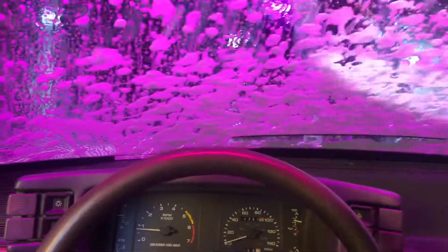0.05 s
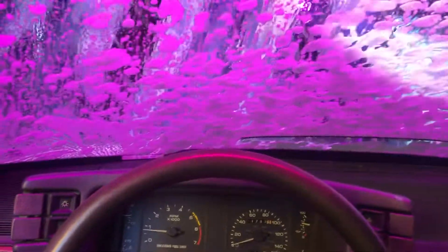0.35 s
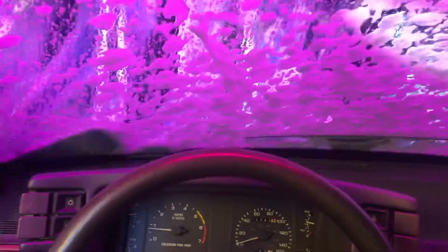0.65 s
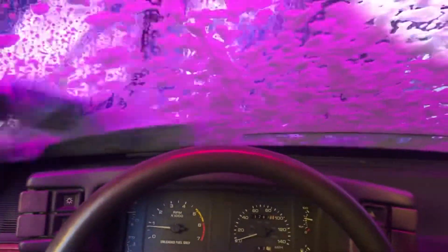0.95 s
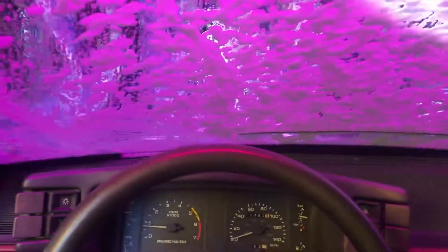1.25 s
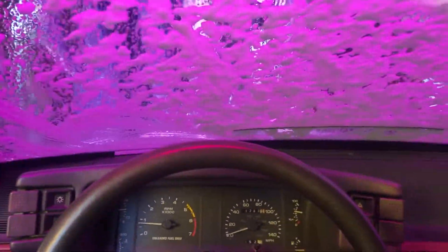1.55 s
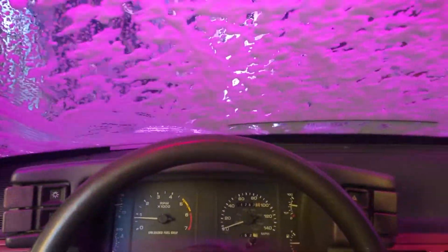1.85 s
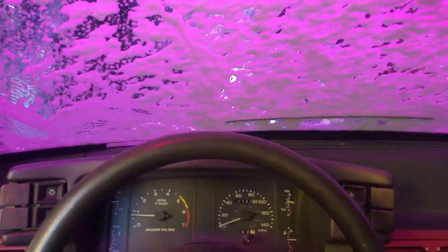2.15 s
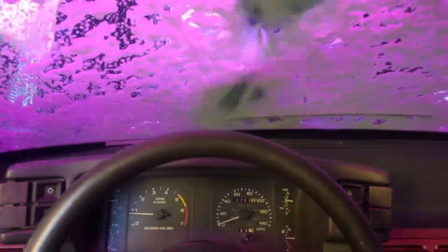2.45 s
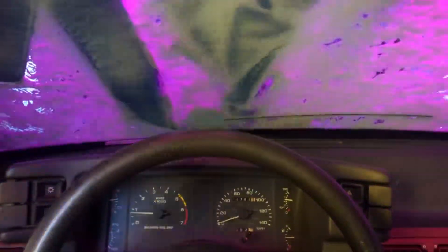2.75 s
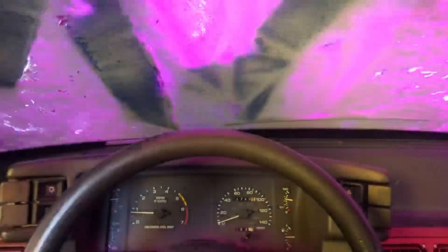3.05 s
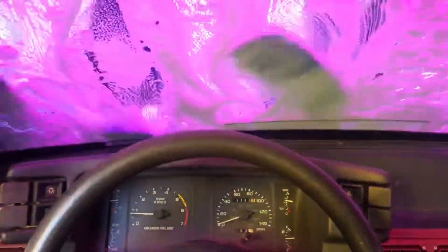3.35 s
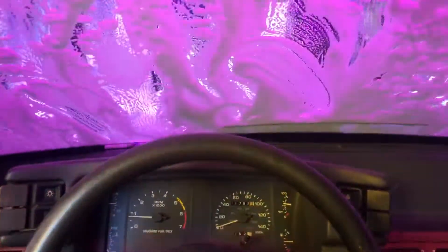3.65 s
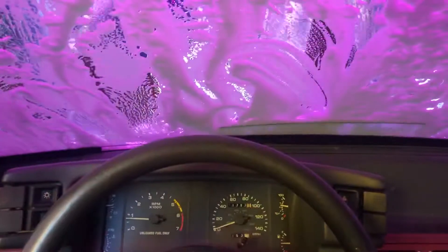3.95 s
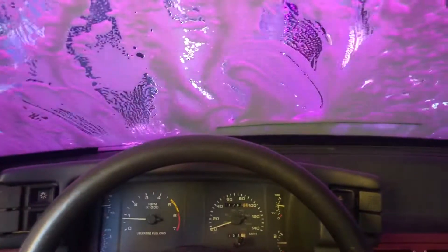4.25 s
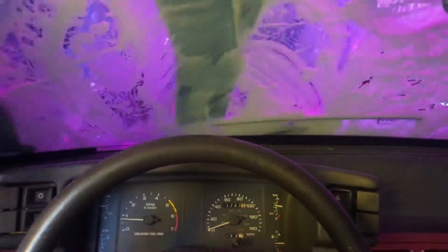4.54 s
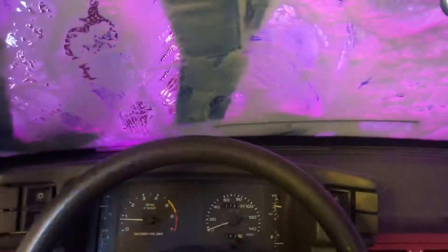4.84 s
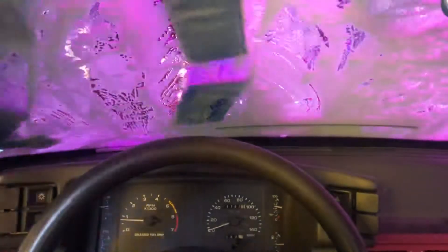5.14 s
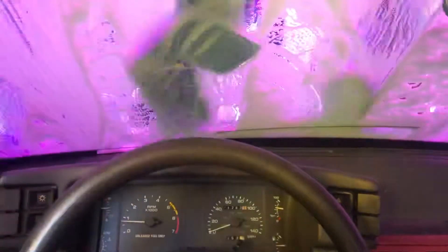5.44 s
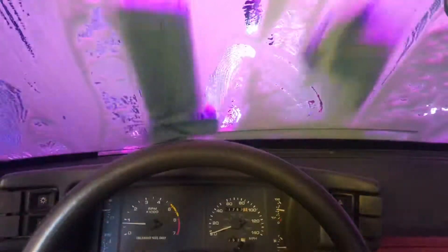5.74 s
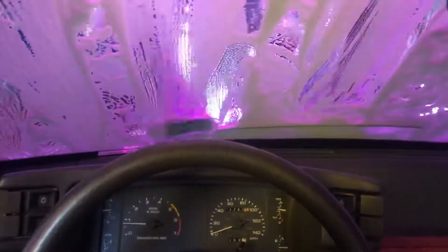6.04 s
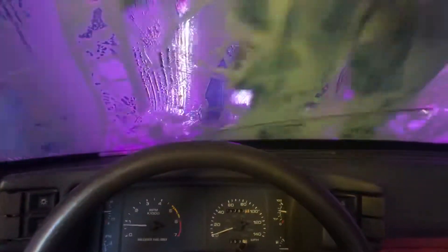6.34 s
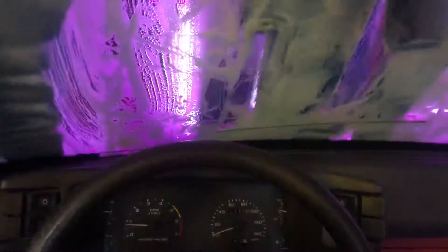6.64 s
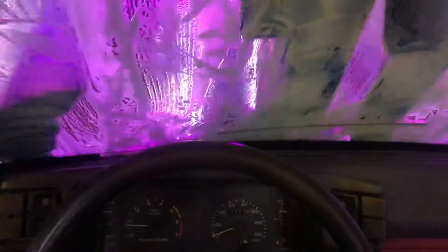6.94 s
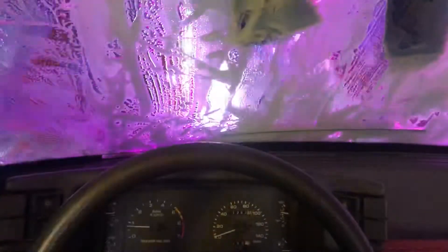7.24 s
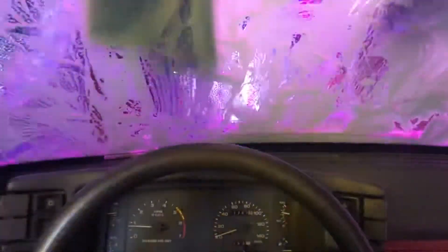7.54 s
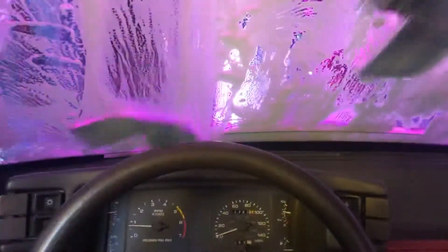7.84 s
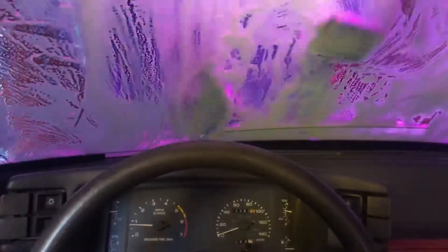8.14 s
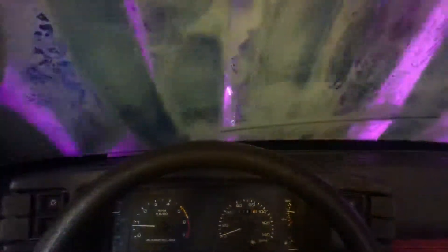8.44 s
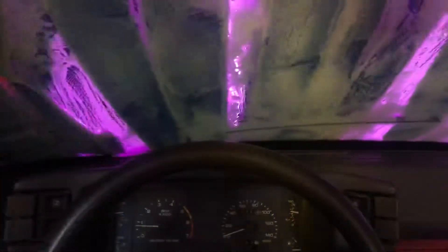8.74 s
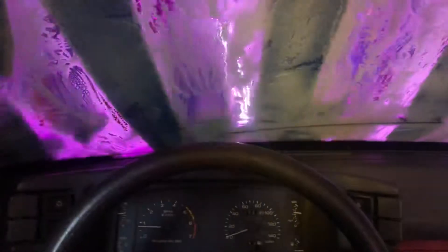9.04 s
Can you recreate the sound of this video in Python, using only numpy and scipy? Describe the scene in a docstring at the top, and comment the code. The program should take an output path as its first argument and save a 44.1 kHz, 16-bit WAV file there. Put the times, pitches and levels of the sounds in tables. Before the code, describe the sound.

An automatic car wash is heard from the driver's seat of a closed car. Machinery hums and dragging cloth makes the body rumble, while water and foam patter and nozzles hiss softly. Wet strips slap the windshield irregularly, and after about two seconds occasional hollow thumps hit the panels. Around six seconds the hiss fades out, and the slaps come more often through the end.

```python
"""An automatic car wash, heard from the driver's seat.
From the start machinery hums, dragging cloth drives the body panels into resonance, foam patters
and drips, nozzles hiss, and wet strips slap the glass. From 2.3 s on, heavy strips now and then thump
a sheet-metal panel, exciting its damped modes. At 5.9 s the valve closes: the hiss decays to a faint
mist and the water slowly thins, while the slaps and thumps go on until the end, at 9 s."""
import sys
import numpy as np
from scipy import signal
from scipy.fft import rfft, irfft, next_fast_len
from scipy.io import wavfile
from scipy.ndimage import uniform_filter1d, map_coordinates

SR = 44100
rng = np.random.default_rng(int(sys.argv[2]) if len(sys.argv) > 2 else 0)


def materialize(psi):
    """Save the field psi as 16-bit PCM at rate SR to the path in sys.argv[1].

    A 1-D psi becomes a single channel; in a 2-D psi each row is a channel.
    """
    bounded = np.clip(np.atleast_2d(psi).T, -1, 1)
    quanta = np.round(bounded * 32767).astype(np.int16)
    wavfile.write(sys.argv[1], SR, quanta)


N = 400869
TIME = np.arange(N) / SR
VALVE_SHUT_S = 5.9


def amp(db):
    """Amplitude ratio of a level in decibels."""
    return 10 ** (np.asarray(db) / 20)

def unit(x):
    """Normalisation to rms 1."""
    return x / np.sqrt(np.mean(x ** 2) + 1e-20)

def noise(length=N):
    """Gaussian white noise."""
    return rng.standard_normal(length)

def since(start):
    """Seconds elapsed after start, zero before it."""
    return np.maximum(TIME - start, 0)

def wobble(rate):
    """Slow random modulation: a spline through rate knots a second."""
    return map_coordinates(noise(4096), [TIME * rate], mode="wrap")

def add(track, start, sound):
    """Superposition of a sound on the track from start [s]."""
    part = track[max(round(start * SR), 0):][:len(sound)]
    part += sound[:len(part)]

def burst(envelope, x):
    """Amplitude modulation of x, scaled to the energy of the envelope."""
    return unit(envelope * x) * np.sqrt(np.mean(envelope ** 2))

def filtered(x, response):
    """Linear filtering: the spectrum of x times a frequency response."""
    size = next_fast_len(N + SR // 2)
    return irfft(rfft(x, size) * response(np.fft.rfftfreq(size, 1 / SR)), size)[:N]

def coloured(x, spectrum):
    """Spectral shaping by (frequency [Hz], level [dB]) points, at rms 1."""
    f, db = np.transpose(spectrum)
    return unit(filtered(x, lambda hz: amp(np.interp(np.log(hz + 1), np.log(f), db))))

def patchy(x, depth_db, bins, frames):
    """Spectral modulation: random gain in patches of bins (86 Hz each) by frames (6 ms each)."""
    spectra = signal.stft(x, nperseg=512)[2]
    field = uniform_filter1d(rng.standard_normal(spectra.shape), bins, axis=0)
    field = uniform_filter1d(field, frames, axis=1)
    return unit(signal.istft(spectra * amp(depth_db * unit(field)), nperseg=512)[1][:N])

def resonance(f, hz, width_hz):
    """Complex response of a damped harmonic oscillator."""
    return 1j * f * width_hz / (hz * hz - f * f + 1j * f * width_hz)

def pocket(x, hz, q):
    """Resonant filtering, as by a pocket of trapped air with quality factor q, at rms 1."""
    ring = resonance(np.fft.rfftfreq(len(x), 1 / SR), hz, hz / q)
    return unit(irfft(rfft(x) * ring * (ring + 1), len(x)))

def splats(rate, spread_db, t60, steady):
    """Shot noise: the powers of random decaying impacts, rate a second, add to a steady share."""
    onset, chance = rng.random((2, 20000))
    size = np.minimum(noise(len(onset)), 2)
    hit = chance < rate * N / SR / len(chance)
    energy = np.bincount((onset[hit] * N).astype(int), amp(spread_db * size[hit]) ** 2, N)
    decay = amp(-60 * TIME[:SR // 8] / t60)
    power = np.abs(signal.fftconvolve(energy, decay ** 2)[:N])
    return noise() * np.sqrt(power / power.mean() + steady)


# Machine tones: (frequency [Hz], mean rms level [dB], frequency deviation [Hz])
MACHINE_TONES = [(47.4, -41, 1.04), (116.4, -33, 3.935)]

def machinery():
    """Forced vibration: motors and pumps drone through the body, wavering under load."""
    hum = np.zeros(N)
    for hz, db, waver_hz in MACHINE_TONES:
        phase = 2 * np.pi * np.cumsum(hz + waver_hz * wobble(12)) / SR
        hum += amp(db + 1.7 * wobble(7.7)) * np.sqrt(2) * np.sin(phase)
    return hum


# Nozzle hiss spectrum: (frequency [Hz], relative level [dB])
HISS_SPECTRUM = [(1500, -25), (3000, 4), (5500, 3), (7200, 1.5), (8900, 4), (10500, 2), (12000, -0.5),
                 (15500, -2.5)]

def nozzles(spray_db=-57, fall_db_per_s=22, mist_db=-74):
    """Broadband spray noise decays exponentially once the valve closes; a faint mist spits throughout."""
    spray = patchy(coloured(noise(), HISS_SPECTRUM), depth_db=1.0, bins=14, frames=24)
    spits = splats(rate=35, spread_db=-1.0, t60=0.18, steady=0.6)
    mist = patchy(coloured(spits, HISS_SPECTRUM), depth_db=-2.5, bins=24, frames=12)
    level_db = spray_db - fall_db_per_s * since(VALVE_SHUT_S) + 0.12 * wobble(2.2)
    return amp(level_db) * spray + amp(mist_db) * mist


def plops(rate, low_hz, high_hz, cycles, spread_db):
    """Cavity resonance: each drop rings at its own pitch, which rises as the cavity closes."""
    onset, chance, pitch, size, life = rng.random((5, 6000, 1))
    hit = chance[:, 0] < rate * N / SR / len(chance)
    hz = low_hz * (high_hz / low_hz) ** pitch[hit]
    t = TIME[:SR // 30]
    age = t * hz / (cycles * (0.5 + life[hit]))
    gain = amp(spread_db * np.minimum(-np.log(size[hit]), 3))
    ring = gain * np.sqrt(age) * np.exp(-2 * age) * np.sin(2 * np.pi * hz * t * (1 + 0.03 * age))
    samples = (onset[hit] * N).astype(int) + np.arange(len(t))
    return unit(np.bincount(samples.ravel(), ring.ravel(), N)[:N])

# Spectra of the dull pat and the wet tick: (frequency [Hz], relative level [dB])
PATTER_SPECTRUM = [(150, -68), (260, 0.5), (400, 0.5), (550, -3), (630, -8), (740, -7), (850, -10.5),
                   (960, -8), (1060, -12), (1150, -11.5), (1450, -16.5), (1900, -30), (3000, -29),
                   (6000, -66)]
SPLATTER_SPECTRUM = [(700, -48), (1500, 7), (2200, 5), (3100, -3.5), (4200, -2.5), (5500, -7), (8000, -13),
                     (12000, -23), (16000, -36)]

def water(drag_db, patter_db=-35, splatter_db=-53.5, drain_db_per_s=0.5):
    """Impact noise: each blob of foam lands with a pat and a tick; small drops fall between them."""
    blobs = splats(rate=120, spread_db=2.54, t60=0.086, steady=0.46)
    blobs = patchy(blobs, depth_db=1.83, bins=5, frames=7)
    big_drops = plops(rate=220, low_hz=600, high_hz=2200, cycles=6, spread_db=2.5)
    fine_drops = plops(rate=220, low_hz=1400, high_hz=5500, cycles=12, spread_db=3)
    patter = 0.86 * coloured(blobs, PATTER_SPECTRUM) + 0.22 * coloured(big_drops, PATTER_SPECTRUM)
    splatter = 0.89 * coloured(blobs, SPLATTER_SPECTRUM) + 0.21 * coloured(fine_drops, SPLATTER_SPECTRUM)
    fling_db = 0.076 * (drag_db - drag_db.mean())  # harder drag throws more water
    sway_db = 0.97 * wobble(14)  # swinging strips fling it in clumps
    flow_db = fling_db + sway_db - drain_db_per_s * since(VALVE_SHUT_S)
    return amp(flow_db) * (amp(patter_db) * patter + amp(splatter_db) * splatter)


# Fat drops on the car: (time [s], level [dB], frequency [Hz])
FAT_DROPS = [(0.215, -40, 3900), (0.297, -38.5, 2400), (0.375, -29, 1230), (0.384, -27.5, 1290),
             (0.565, -25, 510), (1.063, -28.5, 1180), (1.177, -28.5, 1090), (4.055, -41.5, 4500),
             (5.34, -37.5, 1580), (6.014, -50, 5000), (6.234, -52, 9200), (6.576, -34, 3700),
             (7.426, -38.5, 3580), (8.133, -54, 12500)]

def drips(rise_s=0.0025):
    """Transient excitation: a fat drop bursts and briefly rings the air that it traps."""
    track = np.zeros(N)
    age = TIME[:SR // 20] / rise_s
    envelope = age * np.exp(1 - age)
    for start, db, hz in FAT_DROPS:
        splat = pocket(noise(len(age)), hz, q=0.62)
        plink = pocket(splat, hz, q=4.6)
        add(track, start, amp(db) * burst(envelope, plink))
    return track


# Strength of the cloth's drag over the car: (time [s], level [dB])
DRAG_LEVELS = [(0.0, -33.5), (0.3, -30), (1.39, -28), (1.62, -26.5), (2.66, -25), (2.83, -26), (4.43, -24),
               (5.16, -28), (5.72, -25.5), (5.97, -24.5), (7.1, -27), (7.8, -27.5), (8.13, -24.5),
               (8.65, -28.5), (9.09, -28.5)]

def cloth_drag():
    """Envelope of the frictional excitation, in dB at each sample."""
    return np.interp(TIME, *np.transpose(DRAG_LEVELS))

# Modes of the panels and cabin air: (frequency [Hz], bandwidth [Hz], relative level [dB])
BODY_MODES = [(67, 25, -11.5), (100.5, 30.8, -1.5), (120.8, 34.3, 0), (167.2, 35.8, -1), (275, 83, -10.5),
              (308, 33.4, -7.5), (369.3, 12.1, -9)]
# Shudder of the whole car: (frequency [Hz], relative level [dB])
SHUDDER_SPECTRUM = [(10, -22), (22, -3), (38, 4), (60, -8), (120, -51)]

def body(drag_db, drum_gain_db=1.5, shudder_gain_db=-24):
    """Modal response: dragging cloth drums the panels at their resonances; the car shudders beneath."""
    def panels(f):
        return sum((-1) ** k * amp(db) * resonance(f, hz, width)
                   for k, (hz, width, db) in enumerate(BODY_MODES))
    impacts = splats(rate=80, spread_db=3.0, t60=0.026, steady=1.0)
    soft_contact = [(20, -17), (60, 1.5), (380, -9.5), (900, -30), (3000, -50)]
    drumming = coloured(filtered(impacts, panels), soft_contact)
    shudder = coloured(noise(), SHUDDER_SPECTRUM)
    return amp(drag_db + drum_gain_db) * drumming + amp(drag_db + shudder_gain_db) * shudder


def light_slaps(count, spread_db=2):
    """Random impacts: loose strip ends flick the glass; rows as in STRONG_SLAPS."""
    when, strength = rng.random((count, 2)).T
    times = (np.arange(count) + when) / count * N / SR
    offsets_db = spread_db * (2 * strength - 1)
    return [(start, db - 57.5, 900, db - 42, 3300, db - 63, 0.01) for start, db in zip(times, offsets_db)]

# Spectra of cloth, droplets and foam: (frequency [Hz], relative level [dB])
SMACK_SPECTRUM = [(200, -31), (550, 15.5), (1050, 6.5), (1500, 4.5), (2300, 1.5), (5000, -41)]
SPLASH_SPECTRUM = [(800, -25), (1900, 19), (3300, 6.5), (4300, 6), (5600, 7), (8000, -1), (14000, -26)]
FIZZ_SPECTRUM = [(4000, -29), (7500, 2.5), (11000, -7), (16000, -13)]
# Strips hitting the glass: (time [s], smack level [dB], smack frequency [Hz], splash level [dB],
# splash frequency [Hz], fizz level [dB], 60 dB decay time [s])
STRONG_SLAPS = [(0.2135, -24.5, 930, -34.5, 3800, -51, 0.055), (0.642, -30.5, 1100, -44, 2400, -66, 0.11),
                (0.7706, -33, 1000, -40.5, 4170, -44, 0.065), (1.683, -31, 800, -47, 3000, -62, 0.054),
                (1.745, -24, 750, -50, 3000, -62, 0.03), (1.98, -29, 900, -37, 3400, -49, 0.11),
                (2.318, -34, 900, -55, 2400, -68, 0.085), (2.536, -35, 1200, -36, 2600, -48, 0.058),
                (2.649, -30, 1010, -33.5, 3340, -49, 0.093), (2.788, -31, 900, -42, 4500, -59, 0.041),
                (3.093, -35, 1000, -46, 3000, -65, .04), (3.238, -36, 1100, -41, 2600, -63, 0.037),
                (4.0455, -22.5, 810, -41, 4350, -49, 0.063), (4.185, -26, 960, -39.5, 4000, -49, 0.082),
                (4.233, -30, 700, -40, 4000, -61, 0.054), (4.339, -30, 900, -41.5, 3880, -64, 0.053),
                (4.522, -28.5, 745, -41, 3500, -61, 0.04), (4.619, -28, 720, -41, 2700, -71, .09),
                (4.899, -28, 900, -42, 2500, -67, 0.034), (4.946, -31.5, 1400, -44, 2900, -67, .04),
                (5.729, -23.5, 1050, -31, 2650, -65, 0.054), (5.836, -32, 900, -40, 2900, -63, 0.044),
                (5.878, -20.5, 940, -33, 3300, -51.5, 0.055), (6.041, -21.5, 750, -42, 4300, -65, 0.022),
                (6.107, -30, 1290, -37.5, 3100, -69, .08), (6.1935, -24, 1090, -30, 3150, -68, 0.041),
                (6.36, -27, 1140, -43, 3200, -71, .05), (6.375, -24, 850, -44, 4200, -73, 0.05),
                (6.423, -29, 1000, -38, 3000, -68, 0.049), (6.504, -39, 1000, -39, 2900, -68, .06),
                (6.5747, -34, 800, -24.5, 4000, -62, 0.031), (6.725, -24, 930, -30.5, 3540, -51, 0.076),
                (6.792, -32, 800, -35, 3200, -49, 0.06), (7.057, -35, 900, -40, 3600, -66, 0.073),
                (7.425, -57, 900, -52, 3750, -50, 0.16), (7.731, -25.5, 1140, -34, 2850, -59, 0.037),
                (7.858, -40, 905, -37, 3100, -69, 0.19), (7.938, -34, 900, -47, 4130, -58, .08),
                (8.027, -36, 850, -42, 3300, -63, 0.1), (8.046, -31, 1300, -36, 3330, -62, 0.06),
                (8.126, -29, 1140, -40.5, 3800, -58, 0.11), (8.182, -36, 900, -43.5, 3300, -60, 0.096),
                (8.303, -28.5, 1100, -39, 3500, -50, 0.12), (8.474, -41, 900, -37.5, 3120, -50, 0.053),
                (8.696, -29, 940, -40, 2600, -56.5, 0.15), (8.854, -33, 900, -39, 3220, -73, 0.064),
                (9.028, -32, 774, -39, 3340, -46, 0.12)]

def slaps(lead_s=0.05, attack_share=0.031, swish_db=-17, swish_share=0.7, flap_hz=415, flap_db=-2.5):
    """Air-pocket resonance: a wet strip swishes in, pops on the glass and squeezes out droplets."""
    smack, splash, fizz = np.zeros((3, N))
    t = TIME[:SR // 4] - lead_s
    cloth = coloured(noise(), SMACK_SPECTRUM)
    droplets = coloured(splats(rate=2500, spread_db=3.0, t60=0.0013, steady=0.78), SPLASH_SPECTRUM)
    for hit_s, smack_db, smack_hz, splash_db, splash_hz, fizz_db, t60 in STRONG_SLAPS + light_slaps(7):
        age = t / t60
        landed = np.maximum(age, 0)
        contact = amp(-60 * landed) * (1 - np.exp(-landed / attack_share))  # longer wipes land softer
        swish = amp(swish_db - 60 * np.abs(age) / swish_share)  # the strip brushes before it lands
        wet = np.maximum(contact, swish)
        splash_q = (splash_hz / 2400) ** 2  # small, high-pitched pockets ring the most cleanly
        stretch = rng.integers(N - len(t)) + np.arange(len(t))
        pop = pocket(cloth[stretch], smack_hz, q=1.5)
        flap = pocket(pocket(noise(len(t)), flap_hz, q=1.5), flap_hz, q=1.5)  # the glass gives
        squirt = pocket(droplets[stretch], splash_hz, splash_q)
        start = hit_s - lead_s
        add(smack, start, amp(smack_db) * (burst(contact, pop) + amp(flap_db) * burst(contact, flap)))
        add(splash, start, amp(splash_db) * burst(wet, squirt))
        add(fizz, start, amp(fizz_db) * wet)
    foam = patchy(coloured(noise(), FIZZ_SPECTRUM), depth_db=5.5, bins=24, frames=8)
    return smack + splash + fizz * foam


# Hollow modes of a struck panel: (frequency [Hz], relative level [dB], 60 dB decay time [s])
KNOCK_MODES = [(260, 2.5, 0.12), (335, 2, 0.096), (399, -0.5, 0.094), (489, -3.5, 0.098), (604, -7, 0.05)]
# Heavy blows on a panel: (time [s], boom level [dB], settled frequency [Hz], initial frequency [Hz],
# rise time [s], knock level [dB])
PANEL_BLOWS = [(2.318, -22, 149, 384, 0.019, -20), (2.5405, -7.5, 169, 454, 0.0066, -27.5),
               (4.049, -18, 84.5, 200, 0.023, -34), (5.8856, -4, 171, 242, 0.012, -13.5),
               (6.036, -22, 74.5, 74, 0.071, -22), (6.374, -23, 122, 380, 0.0098, -17.5),
               (6.79, -17, 120, 122, 0.027, -27), (7.879, -9, 179, 178, 0.017, -24),
               (8.305, -9.5, 165, 259, 0.013, -16.5)]

def thumps(settle_s=0.0039, rise_share=0.2, scatter_db=1.1):
    """Damped vibration: a heavy strip sets a panel knocking and booming, then damps it by lying on it."""
    track = np.zeros(N)
    t = TIME[:SR // 4]
    for start, boom_db, hz, first_hz, rise_s, knock_db in PANEL_BLOWS:
        age = t / rise_s
        pitch = hz + (first_hz - hz) * np.exp(-t / settle_s)  # dispersion: high bending waves come first
        boom = age * np.exp((1 - age ** 2) / 2) * np.sin(2 * np.pi * np.cumsum(pitch) / SR)
        knock = sum(amp(db + scatter_db * rng.normal() - 60 * t / t60) * np.sin(2 * np.pi * mode_hz * t)
                    for mode_hz, db, t60 in KNOCK_MODES)
        attack = 1 - np.exp(-age / rise_share)
        add(track, start, amp(boom_db) * boom + amp(knock_db) * knock * attack)
    return track


def scene():
    """Superposition of all sources inside the closed cabin."""
    drag_db = cloth_drag()
    return (machinery() + body(drag_db) + water(drag_db) + nozzles() + slaps() + drips() + thumps())[None]

def record(dry):
    """Band limiting: an ideal low-pass filter cuts off at 15.7 kHz."""
    return filtered(dry[0], lambda hz: hz < 15700)[None]


dry = scene()
out = record(dry)
materialize(out)
```